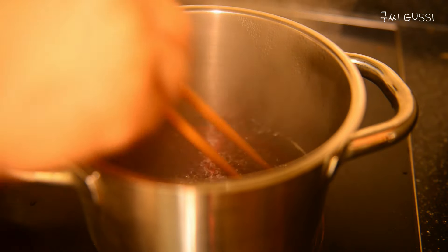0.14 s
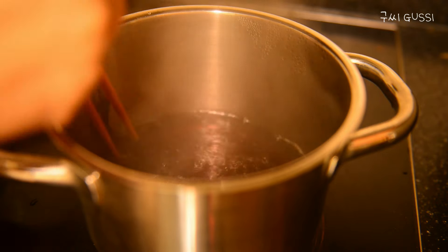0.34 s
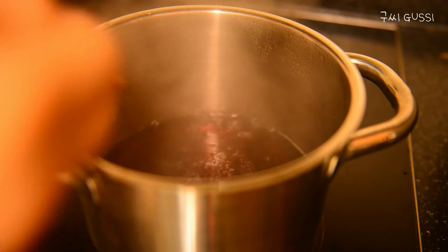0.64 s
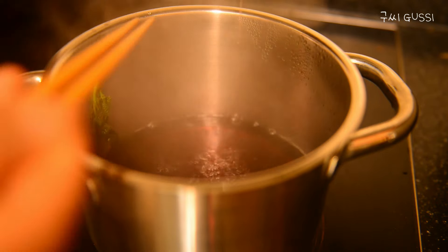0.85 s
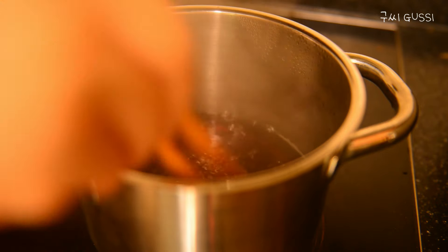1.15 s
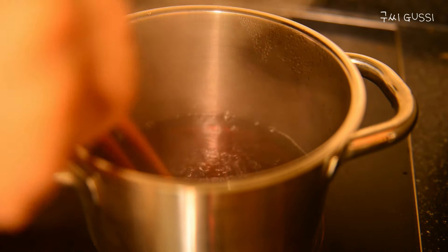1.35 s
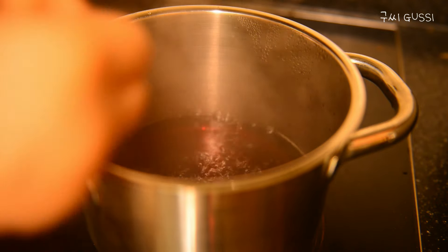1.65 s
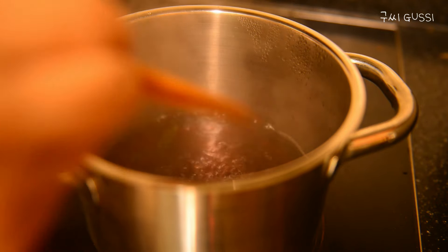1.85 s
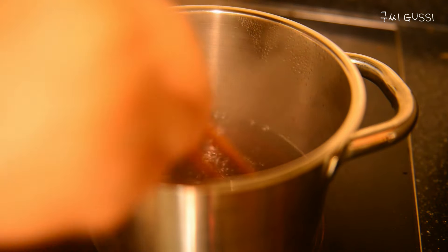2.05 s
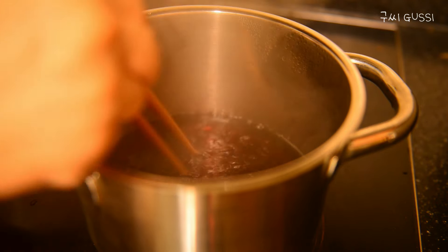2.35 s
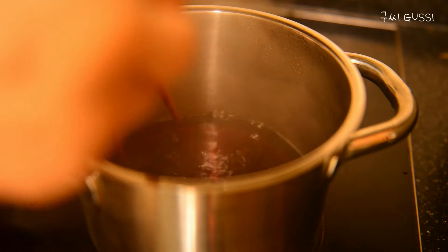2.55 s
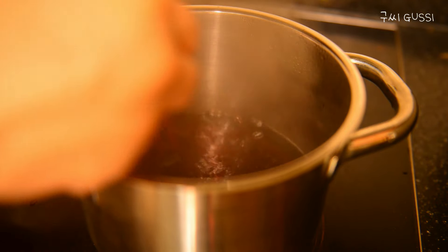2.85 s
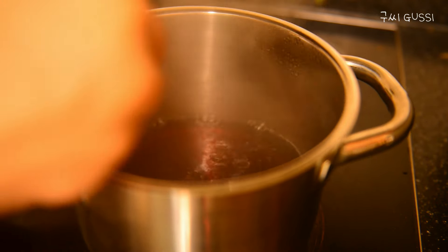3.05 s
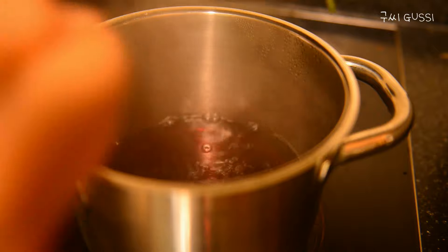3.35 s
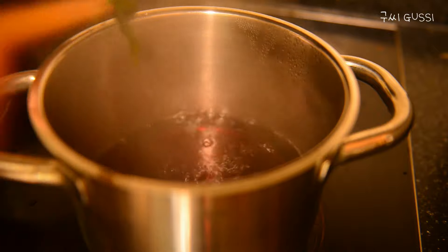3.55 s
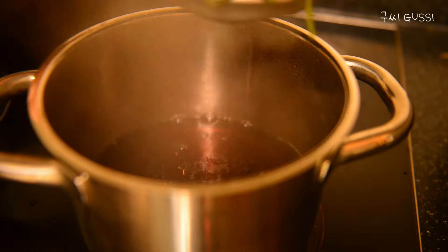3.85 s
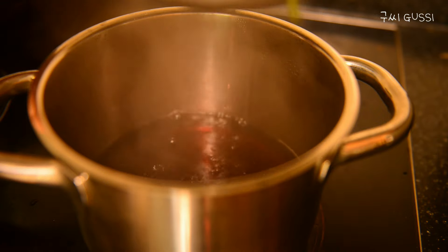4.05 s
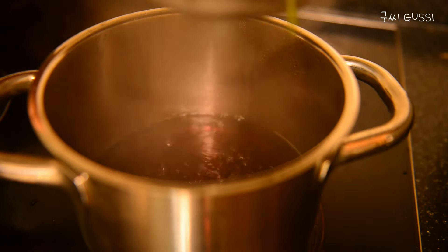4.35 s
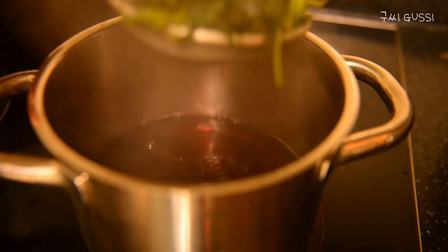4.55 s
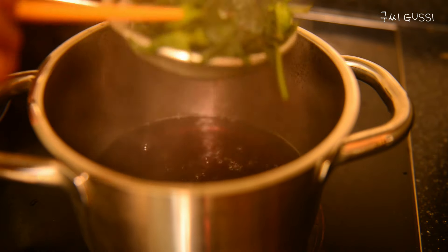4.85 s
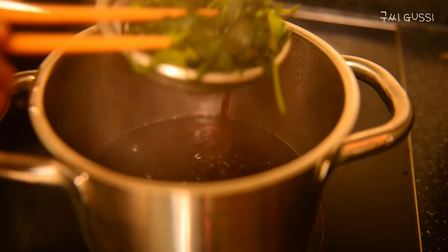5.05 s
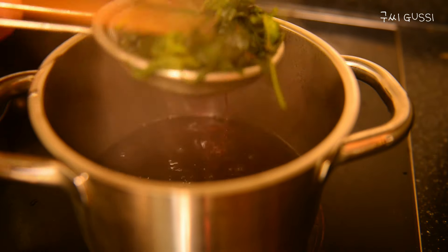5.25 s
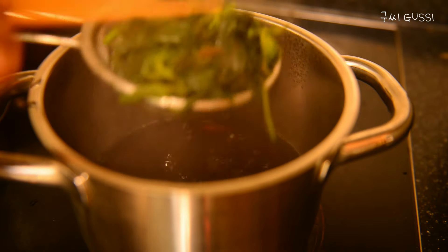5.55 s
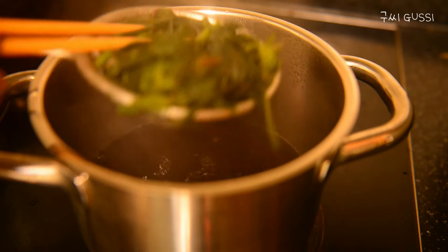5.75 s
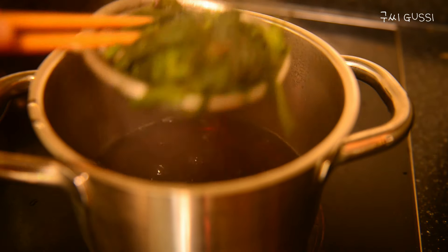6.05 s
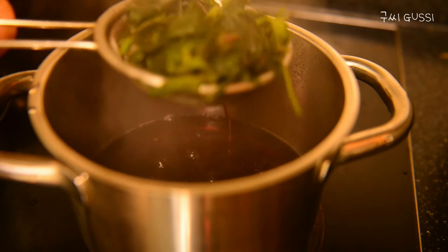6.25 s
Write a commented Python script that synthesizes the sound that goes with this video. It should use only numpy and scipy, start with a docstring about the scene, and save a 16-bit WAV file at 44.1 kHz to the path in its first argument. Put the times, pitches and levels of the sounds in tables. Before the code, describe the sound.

Close to a steel pot in a kitchen, small bubbles murmur and fizz quietly over soft room noise. Chopsticks bump the pot and move wet leaves with a faint crackle, and early on a metal strainer clinks sharply on the rim, the loudest sound. Little drips and high ticks dot the middle. Near the end, the chopsticks tap more busily, the strainer knocks again, and the leaves are patted down with small squelches.

```python
"""In a kitchen, a steel pot simmers on the hob while chopsticks lift boiled leaves into a strainer.
The metal strainer clinks on the rim, the chopsticks knock and tap, and drops plip into the broth.
The wet leaves crackle as they are moved. Small bubbles make the air in the pot murmur, and finer
ones sizzle in swells about twice a second. Behind it all is the soft, steady rush of the room."""
import sys
import numpy as np
from scipy import signal
from scipy.fft import rfft, irfft, next_fast_len
from scipy.io import wavfile
from scipy.ndimage import uniform_filter1d, map_coordinates

SR = 44100
rng = np.random.default_rng(int(sys.argv[2]) if len(sys.argv) > 2 else 0)


def generate_wav(signal):
    """Clip the signal to [-1, 1] and save it as 16-bit WAV at the path in sys.argv[1]."""
    frames = np.transpose(np.atleast_2d(signal))
    scaled = np.clip(frames, -1, 1) * 32767
    pcm = np.round(scaled).astype(np.int16)
    wavfile.write(sys.argv[1], SR, pcm)


N = 281799  # length in samples, about 6.4 s

# the notes of the pot's wall: f/Hz, level/dB, t60/s (the time a sound takes to fade by 60 dB)
POT_NOTES = [(560, -12, .12), (1553, -6, .24), (1780, -10, .08), (2570, -11, .08), (2900, -9, .07),
             (3020, -7, .07), (3985, 1, .12), (6110, -5, .1), (6200, -11, .08), (7490, -8, .08),
             (8970, -15, .08)]
# the notes of the strainer's handle: f/Hz, level/dB, t60/s
HANDLE_NOTES = [(526, -4.5, 0.053), (1048, -8, 0.051), (2510, -2.5, 0.079), (4070, -2.5, 0.058)]
# blows on the rim: t/s, pot level/dB, strainer level/dB, handle level/dB,
# crack level/dB, crack f/Hz, thump level/dB, thump f/Hz
RIM_BLOWS = [(1.114, -32, -67, -50, -31.5, 5200, -52, 330),
             (1.4853, -40, -10.5, -36, -21.5, 5340, -37.5, 294),
             (5.2755, -38, -40, -30, -31, 2800, -43, 230)]
def rim_clinks():
    """Each blow on the rim cracks, rings pot, strainer and handle, and thumps the pot on the hob."""
    out = np.zeros(N)
    for s, pot_db, strainer_db, handle_db, crack_db, crack_hz, thump_db, thump_hz in RIM_BLOWS:
        add(out, s, amp(pot_db) * ring(POT_NOTES, rough=0.41))
        add(out, s, amp(strainer_db) * strainer_rattle(ring_db=-10.5, rise_s=0.0011))
        add(out, s, amp(handle_db) * ring(HANDLE_NOTES, rough=0.85))
        add(out, s, amp(crack_db) * burst(crack_hz, octaves=1.66, t60=0.044))
        add(out, s, amp(thump_db) * pot_thump(thump_hz))
    return out


# the notes of the strainer's frame: f/Hz, relative rattling level/dB, relative ringing level/dB, t60/s
STRAINER_NOTES = [(1061, -28, -27, .3), (1240, -19, -19, .22), (1400, -18, -20, .15), (1570, -19, -18, .3),
                  (2565, -25, -16, .26), (2632, -17, -18, .12), (3490, -21, -13, .25),
                  (3772, -23, -21, .14), (4001, 0, -11, .23), (4155, -22, -22, .1), (4587, -36, -22, .3),
                  (4808, -17, -19, .12), (4935, -15, -15, .18), (5213, -10, -4, .15), (5325, -19, -13, .18),
                  (6180, -17, -14, .16), (6835, -31, -26, .18), (7380, -24, -17, .11), (7718, -16, -20, .1),
                  (8176, -26, -17, .17), (8990, -23, -23, .09), (9367, -27, -22, .09), (9950, -30, -27, .1)]
def strainer_rattle(ring_db, rise_s):
    """The strainer buzzes hard while it rattles on the rim, then rings on softly."""
    t = seconds(SR // 2)
    pressed = np.exp(-(t / .015) ** 3.5)  # the rattle stops suddenly, after about 15 ms
    contact = (1 - np.exp(-t / rise_s)) * pressed
    out = np.zeros(len(t))
    for hz, rattle_db, free_db, t60 in STRAINER_NOTES:
        out += amp(rattle_db) * contact * steel_note(hz, t, rough=0.71)
        out += amp(ring_db + free_db) * (1 - pressed) * fade(t, t60) * steel_note(hz, t, rough=1.7)
    return out


def ring(notes, rough):
    """Struck steel sounds several notes at once, each fading at its own speed."""
    t = seconds(SR // 3)
    return sum(amp(db + rng.normal(0, 1)) * fade(t, t60) * steel_note(hz, t, rough)
               for hz, db, t60 in notes)


def steel_note(hz, t, rough):
    """One note that wavers as the hand and the broth weigh on the steel."""
    return np.sin(2 * np.pi * (hz * t + rng.random()) + rough * wobble(142, len(t)))


def pot_thump(hz):
    """The whole pot bounces on its base."""
    t = seconds(SR // 3)
    rocking = amp(-5.5) * fade(t, t60=0.19) * np.sin(2 * np.pi * 144 * t)
    return burst(hz, octaves=2.84, t60=0.15) + rocking


# bumps on the pot: t/s, knock level/dB, knock f/Hz, thump level/dB, thump f/Hz
POT_KNOCKS = [(0.0505, -38, 1360, -39.5, 352), (1.1974, -37, 1510, -44, 320),
              (5.1766, -41.5, 3580, -40.5, 149)]
# taps on each other and on the strainer: t/s, wood level/dB, wood f/Hz, tip snap level/dB
LIGHT_TAPS = [(2.6561, -47.5, 1880, -27.5), (3.3535, -45, 3240, -37.5), (4.2525, -48, 2480, -41),
              (4.7058, -47, 1350, -41), (5.148, -40.5, 1500, -26), (5.213, -39, 1330, -29.5),
              (5.3141, -41.5, 3200, -29), (5.448, -37.5, 2560, -31.5), (5.908, -42.5, 3400, -47),
              (6.0836, -40.5, 3370, -37), (6.353, -48.5, 3200, -32)]
def chopsticks():
    """Wooden chopsticks knock dully on the pot and tap lightly, with a snap from their tips."""
    out = np.zeros(N)
    for s, db, hz, thump_db, thump_hz in POT_KNOCKS:
        add(out, s, amp(db) * burst(hz, octaves=2.1, t60=0.075))
        add(out, s, amp(thump_db) * pot_thump(thump_hz))
    for s, db, hz, snap_db in LIGHT_TAPS:
        add(out, s, amp(db) * burst(hz, octaves=0.56, t60=0.036))
        add(out, s, amp(snap_db) * tick(hz=7400, body_db=-4, scatter_db=-9.5))
    return out


# single ticks: t/s, level/dB, f/Hz, relative scatter level/dB
SHARP_TICKS = [(0.0859, -34.5, 11500, -8), (1.795, -23.5, 9000, -12), (4.1031, -23, 8740, -4.5),
               (4.8017, -31.5, 6700, -18), (4.826, -33.5, 6560, -13), (5.098, -27, 12000, -12),
               (5.225, -27.5, 7960, -12), (6.0053, -30.5, 11000, -3.5), (6.2188, -33, 8060, -7),
               (6.3466, -32.5, 8000, -10)]
def sharp_ticks():
    """Flying droplets and chopstick tips make sharp, high ticks."""
    out = np.zeros(N)
    for s, db, hz, scatter_db in SHARP_TICKS:
        add(out, s, amp(db) * tick(hz, body_db=-20.5, scatter_db=scatter_db))
    return out


def tick(hz, body_db, scatter_db):
    """A snap with a little lower-pitched body, scattering between the pot's walls."""
    click = signal.unit_impulse(SR // 3)
    snap = band(click, hz, octaves=0.87)
    body = band(click, hz=2800, octaves=0.87)
    scatter = amp(scatter_db - 6) * burst(hz, octaves=0.86, t60=0.044)
    return snap / np.abs(snap).max() + amp(body_db) * body / np.abs(body).max() + scatter


# drops and bursting bubbles: t/s, level/dB, f/Hz, t60/s
PLIPS = [(0.5444, -43.5, 1570, 0.035), (0.9635, -31.5, 1593, 0.033), (1.601, -39, 1570, 0.039),
         (2.2475, -37, 1526, 0.031), (2.836, -37, 1544, 0.047), (4.1455, -40, 1540, 0.018),
         (4.253, -38.5, 2260, 0.013), (4.705, -44, 1510, 0.033), (5.0002, -40, 1500, 0.025)]
def drops():
    """Each drop makes a tiny splash and traps a bubble that rings briefly."""
    out, t = np.zeros(N), seconds(SR // 3)
    for s, db, hz, t60 in PLIPS:
        bubble = np.sin(2 * np.pi * hz * t) * fade(t, t60)
        splash = amp(-10) * burst(hz=2370, octaves=4.3, t60=0.0039)
        add(out, s, amp(db) * (bubble + splash))
    return out


# strokes through the leaves: t/s, level/dB, half length/s
LEAF_STROKES = [(.21, -55, 0.063), (0.32, -52.5, 0.032), (0.63, -53, 0.11), (1.434, -56.5, 0.26),
                (1.655, -55, 0.043), (3.08, -61.5, 0.14), (5.234, -54, .045), (6.14, -56, 0.037)]
# the tone of the rustle, from low to high: f/Hz, relative level/dB
RUSTLE_TONE = [(80, -12), (250, -4), (1200, -2.5), (2000, -11), (3200, -9), (6000, -24)]
# pats in the strainer: t/s, level/dB, f/Hz, squelch level/dB
LEAF_PATS = [(5.908, -36.5, 880, -53), (6.119, -44.5, 780, -42.5), (6.140, -42.5, 850, -45),
             (6.171, -43, 730, -41.5), (6.187, -39.5, 735, -52)]
def wet_leaves():
    """The leaves crackle when stroked, rustle when gripped and squelch when patted down."""
    fine_pops = patchy(pops(rate=4000, spread_db=3.5), depth_db=3)
    crackle = unit(band(fine_pops, hz=8450, octaves=1.17))
    out = crackle * sum(amp(db) * hump(s, half_s) for s, db, half_s in LEAF_STROKES)
    rustle = coloured(pops(rate=1500, spread_db=0), RUSTLE_TONE)
    out += amp(-48.5) * hump(s=3.022, half_s=0.047) * rustle
    for s, db, hz, squelch_db in LEAF_PATS:
        add(out, s, amp(db) * burst(hz, octaves=0.92, t60=0.066))
        add(out, s, amp(squelch_db) * burst(hz=7160, octaves=1.3, t60=0.05))
    return out


# stirs of the chopsticks: t/s, level/dB
BROTH_STIRS = [(.25, -51.5), (1.25, -55), (2.22, -51)]
def stirring():
    """The broth gives a short, low slosh with each stir."""
    slosh = unit(band(pops(rate=2200, spread_db=1.5), hz=555, octaves=0.59))
    return slosh * sum(amp(db) * hump(s, half_s=0.079) for s, db in BROTH_STIRS)


# how strongly the broth bubbles: t/s, relative level/dB
BUBBLING = [(0.0, -55), (0.6, -60), (1.42, -56), (1.97, -59.5), (2.19, -57), (3.79, -60), (5.12, -57),
            (5.61, -63.5), (6.09, -57.5), (6.39, -62)]
# the notes of the air inside the pot: f/Hz, width/Hz, level/dB
AIR_NOTES = [(578, 39, 2), (623.6, 29, 4), (707.5, 60, -0.5), (1340, 120, -15), (1538, 54, -3)]
def simmer():
    """Small bubbles pop and make the air in the pot murmur at its own notes."""
    def hollow(f):
        return sum(amp(db) * 1j * f * width / (hz * hz - f * f + 1j * f * width)
                   for hz, width, db in AIR_NOTES)
    murmur = unit(filtered(pops(rate=900, spread_db=4.5), hollow))
    return amp(curve(BUBBLING) + 1.5) * murmur


# the tone of the sizzle: f/Hz, relative level/dB
SIZZLE_TONE = [(1500, -17), (2300, -8.5), (3000, -2.5), (3600, -1), (4500, -0.5), (4950, -5), (5400, -9),
               (6100, -5.5), (6800, -5), (7400, -18), (12000, -32)]
def sizzle():
    """Fine bubbles fizz all the time; in each swell they grow louder and sing."""
    swell = swells(first_s=0.13, gap_s=0.484, slowing_s=0.012, half_s=0.17, count=12)
    fizz = patchy(coloured(pops(rate=9000, spread_db=4), SIZZLE_TONE), depth_db=1.5)
    fizz_gain = np.hypot(amp(-59) * swell, amp(-57))  # a swelling part and a steady part
    song = singing_bubbles(low_hz=3450, high_hz=4900, half_s=0.045, spread_db=15, count=640)
    return fizz_gain * fizz + amp(-58.5) * swell * song


def swells(first_s, gap_s, slowing_s, half_s, count):
    """A row of swells, each gap slowing_s longer than the last."""
    k = np.arange(count)
    crests = first_s + gap_s * k + slowing_s * k * (k - 1) / 2
    return sum(hump(s, half_s) for s in crests)


def singing_bubbles(low_hz, high_hz, half_s, spread_db, count):
    """Tiny steam bubbles on the hot steel each sing briefly at their own pitch."""
    out, t = np.zeros(N), seconds(SR // 5)
    swell = np.exp(-((t - t.mean()) / half_s) ** 2)
    for slot, (when, pitch, size) in enumerate(rng.random((count, 3))):
        hz = low_hz + pitch * (high_hz - low_hz)
        middle_s = (slot + when) / count * N / SR
        add(out, middle_s - t.mean(), amp(spread_db * size) * swell * np.sin(2 * np.pi * hz * t))
    return unit(out)


# the tone of the spray: f/Hz, relative level/dB
SPRAY_TONE = [(3000, -44), (6000, -19), (7500, -3.5), (9500, 0.5), (11300, -3), (13000, 1.5), (16000, -5)]
def spray():
    """The bubbles throw up a fine, hissing spray that slowly thins."""
    start_db, fall_db_per_s = -60, 0.47
    hiss = patchy(coloured(pops(rate=6000, spread_db=4.5), SPRAY_TONE), depth_db=1)
    return amp(start_db - fall_db_per_s * seconds(N)) * hiss


def spatter(count):
    """Stray droplets tick faintly on the hot steel at random moments."""
    out = np.zeros(N)
    for when, size, pitch in rng.random((count, 3)):
        click = tick(hz=10600 * 2 ** (pitch - .5), body_db=-18, scatter_db=-6)
        add(out, when * N / SR, amp(-42 + 6 * size) * click)
    return out


def kitchen_echo(x, t60):
    """The kitchen answers a sound with a short, blurred echo, 5 ms later."""
    tail = unit(burst(hz=2200, octaves=5, t60=t60)) / np.sqrt(SR // 3)
    return signal.fftconvolve(x, np.pad(tail, (SR // 200, 0)))[:N]


# the tone of the room's background noise: f/Hz, relative level/dB
KITCHEN_TONE = [(20, -16), (45, -1.5), (80, -0.5), (140, 2), (230, -1.5), (450, -0.5), (900, -7),
                (1300, -4), (2100, -15.5), (3200, -9.5), (7000, -14.5), (15000, -21.5)]
def kitchen_rush():
    """A soft, steady rush fills the room."""
    return amp(-57) * coloured(rng.standard_normal(N), KITCHEN_TONE)


def amp(db):
    """Turn decibels into a number to multiply by."""
    return 10 ** (np.asarray(db) / 20)


def unit(x):
    """Scale to an average strength (rms) of 1."""
    return x / np.sqrt(np.mean(x ** 2) + 1e-20)


def seconds(count):
    """The time of each sample."""
    return np.arange(count) / SR


def curve(rows):
    """Join (time, value) points with straight lines."""
    return np.interp(seconds(N), *np.transpose(rows))


def fade(t, t60):
    """Die away by 60 dB every t60 seconds."""
    return np.exp(-np.log(1000) * t / max(t60, 1e-4))


def hump(s, half_s):
    """A bell-shaped swell of height 1 around time s."""
    return np.exp(-((seconds(N) - s) / half_s) ** 2)


def wobble(rate, count):
    """A smooth curve through rate random points a second."""
    points = rng.standard_normal(int(count * rate / SR) + 4)
    return map_coordinates(points, [np.arange(count) * rate / SR])


def add(track, s, sound):
    """Mix a sound into the track at time s."""
    start = max(round(s * SR), 0)
    track[start:start + len(sound)] += sound[:N - start]


def filtered(x, response):
    """Turn each frequency up or down by response(frequency)."""
    size = next_fast_len(len(x) + SR // 2)
    return irfft(rfft(x, size) * response(np.fft.rfftfreq(size, 1 / SR)), size)[:len(x)]


def coloured(x, points):
    """Shape x with a tone table, at strength 1."""
    f, db = np.transpose(points)
    return unit(filtered(x, lambda hz: amp(np.interp(np.log(hz + 1), np.log(f), db))))


def band(x, hz, octaves):
    """Keep the frequencies around hz, in a band this many octaves wide."""
    edges = np.minimum(hz * 2 ** (np.array([-.5, .5]) * octaves), [SR / 3, SR / 2.1])
    return signal.sosfilt(signal.butter(2, edges, "band", fs=SR, output="sos"), x)


def burst(hz, octaves, t60):
    """A dying puff of noise around hz that starts at strength 1."""
    decay = fade(seconds(SR // 3), t60)
    puff = band(decay * rng.standard_normal(len(decay)), hz, octaves)
    return unit(puff) * np.sqrt(np.mean(decay ** 2))


def pops(rate, spread_db):
    """Tiny random clicks of uneven size, about rate a second, at strength 1."""
    sizes = amp(spread_db * np.clip(rng.standard_normal(N), -2, 2)) * rng.choice([-1, 1], N)
    return unit(sizes * (rng.random(N) < rate / SR))


def patchy(x, depth_db):
    """Let small patches of high and low sound flare and sink at random."""
    spectrum = signal.stft(x, nperseg=512)[2]
    patches = uniform_filter1d(rng.standard_normal(spectrum.shape), size=7, axis=0)  # blur over pitch
    patches = uniform_filter1d(patches, size=16, axis=1)  # blur over time
    return unit(signal.istft(spectrum * amp(depth_db * unit(patches)), nperseg=512)[1][:N])


def scene():
    """Utensils, drops and leaves over the simmering pot and the kitchen's rush, in one channel."""
    hits = rim_clinks() + chopsticks() + sharp_ticks() + drops()
    cooking = wet_leaves() + stirring() + simmer() + sizzle() + spray() + spatter(count=10)
    room = amp(-15) * kitchen_echo(hits, t60=0.15) + kitchen_rush()
    return (hits + cooking + room)[None]


def record(dry):
    """Cut away the very highest treble."""
    top_hz = 15800
    return filtered(dry[0], lambda hz: 1 / np.sqrt(1 + (hz / top_hz) ** 200))[None]


dry = scene()
out = record(dry)
generate_wav(out)
```